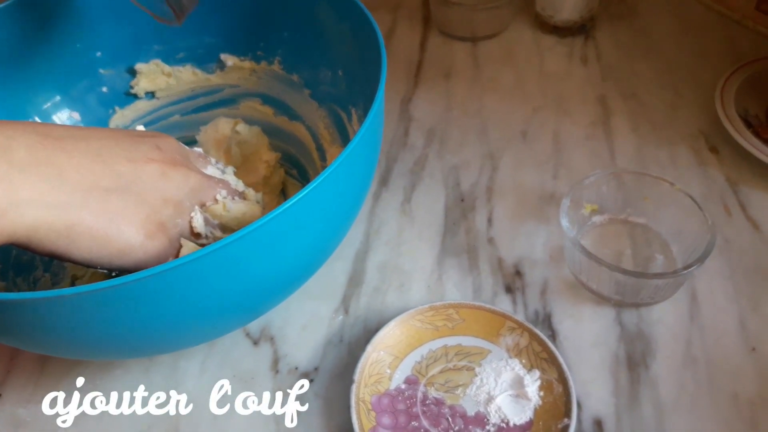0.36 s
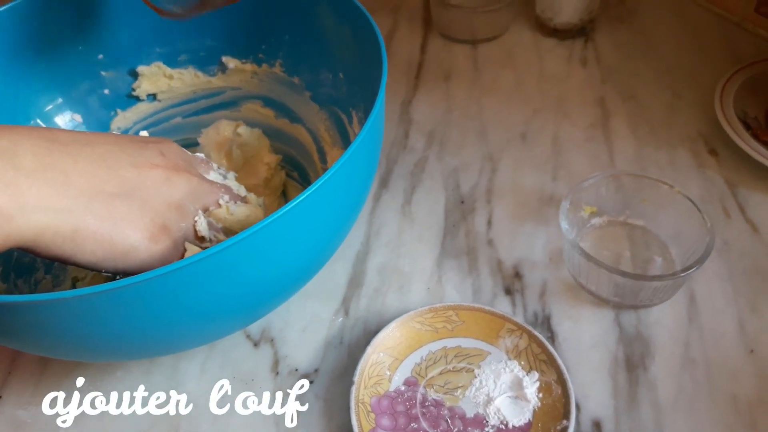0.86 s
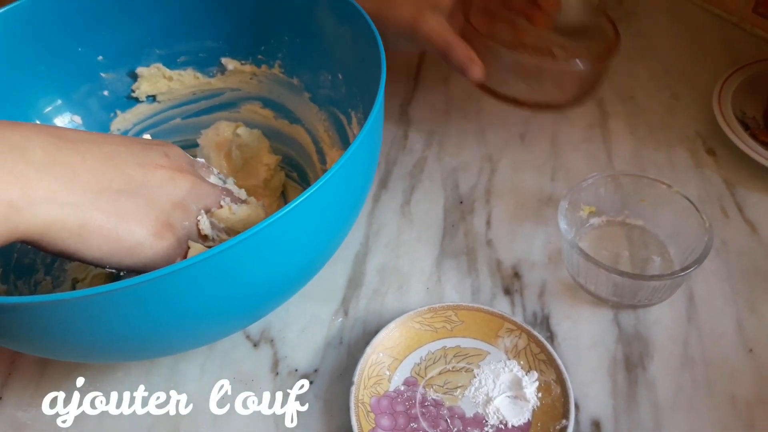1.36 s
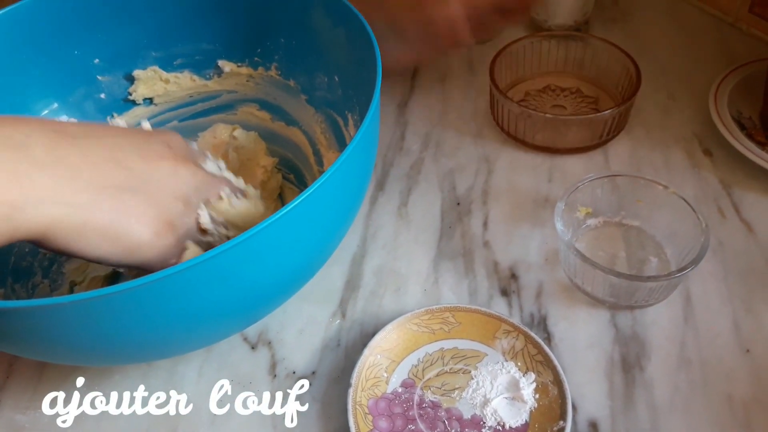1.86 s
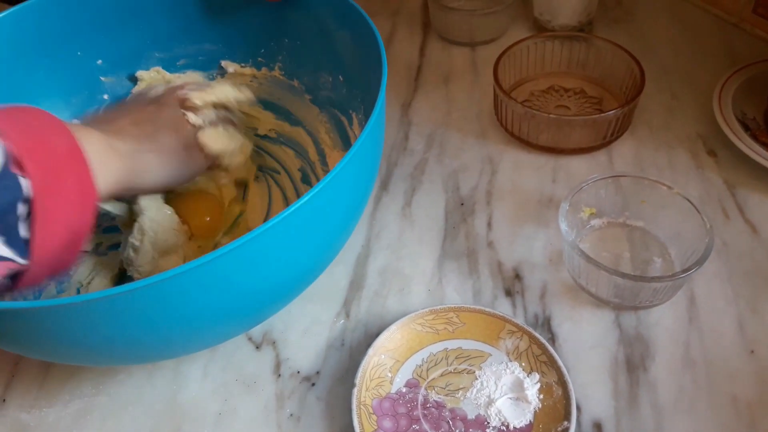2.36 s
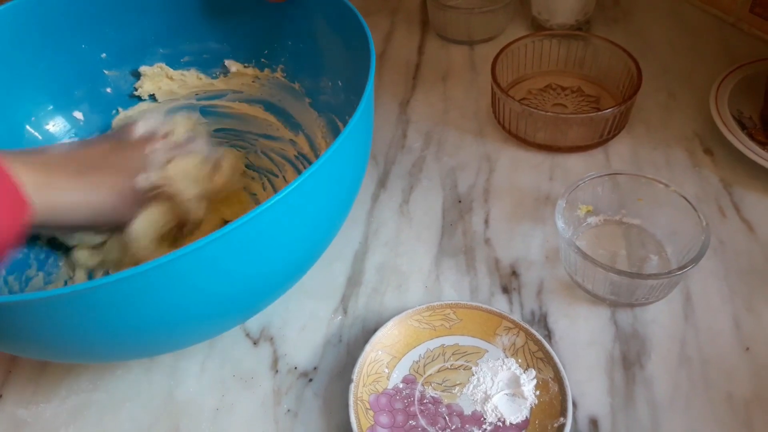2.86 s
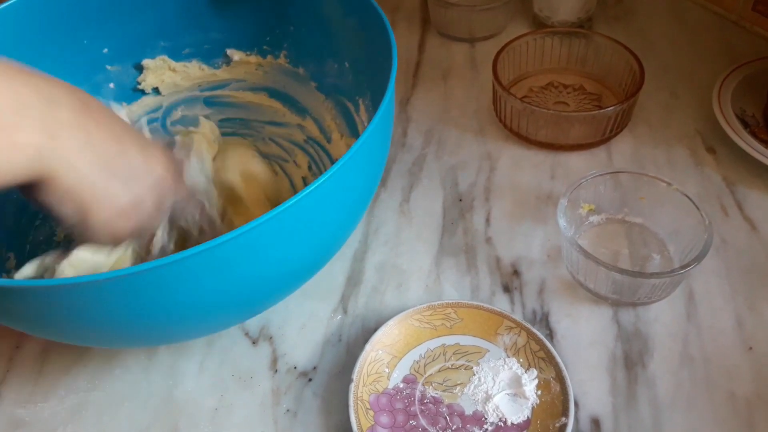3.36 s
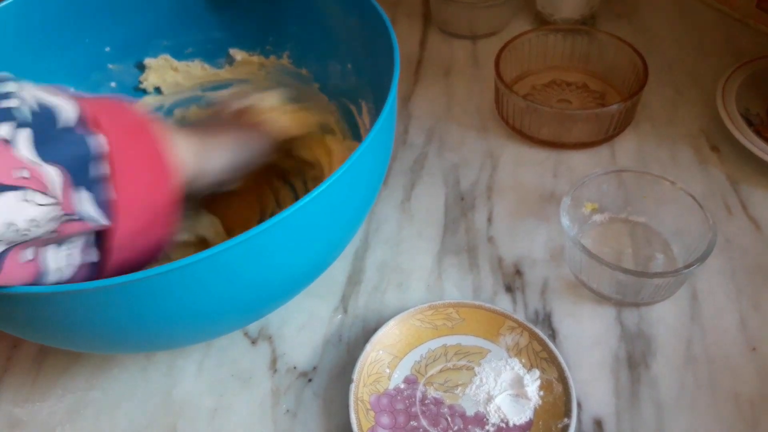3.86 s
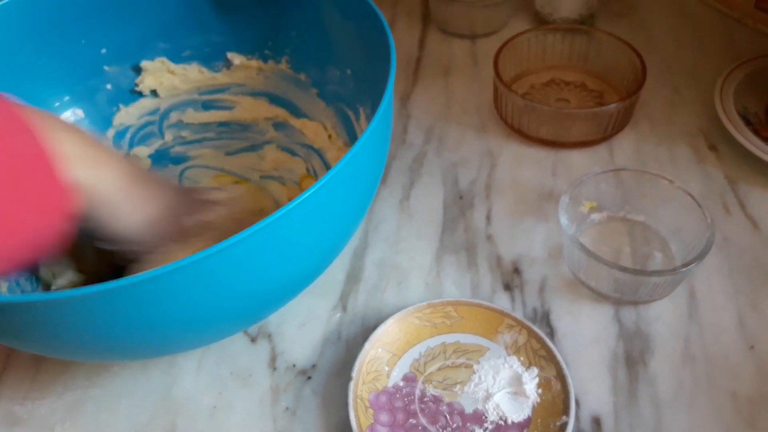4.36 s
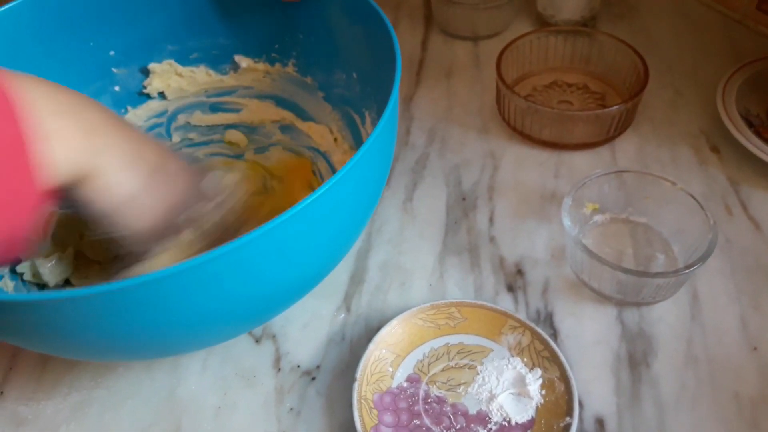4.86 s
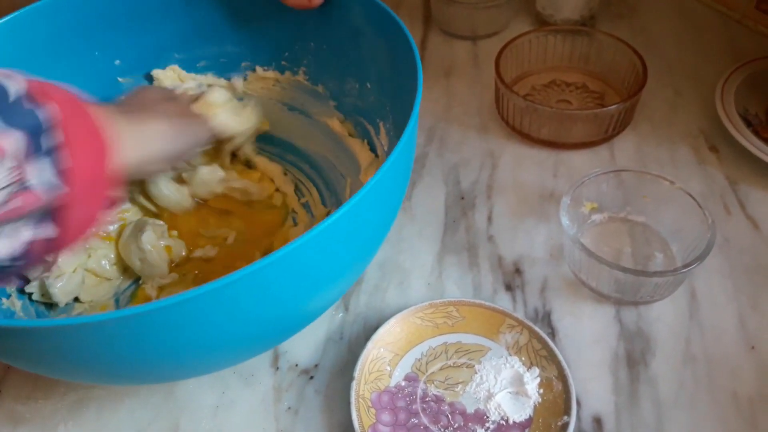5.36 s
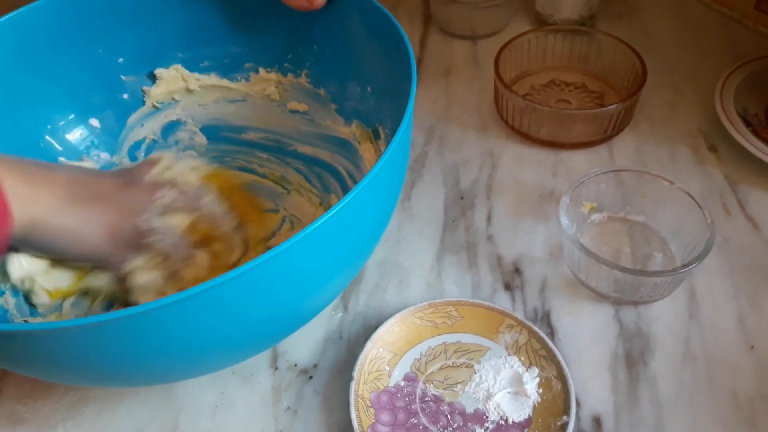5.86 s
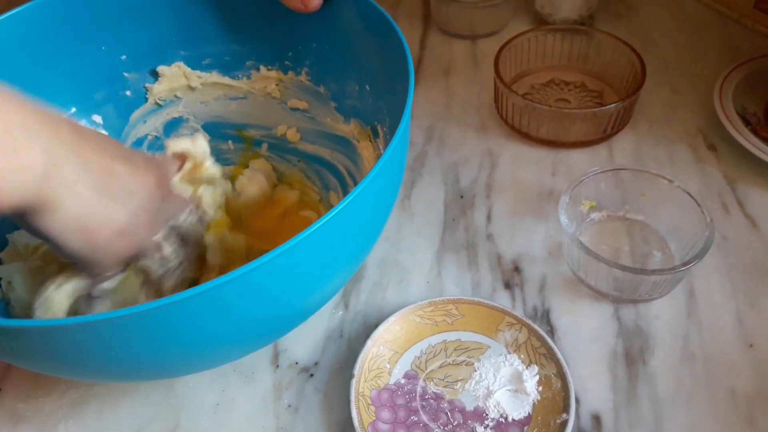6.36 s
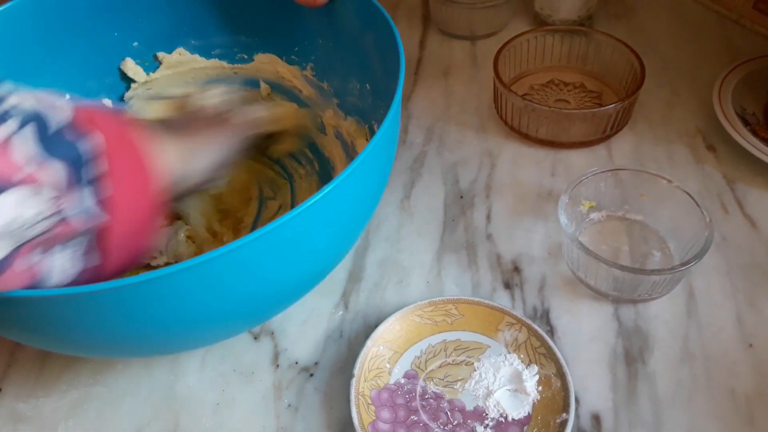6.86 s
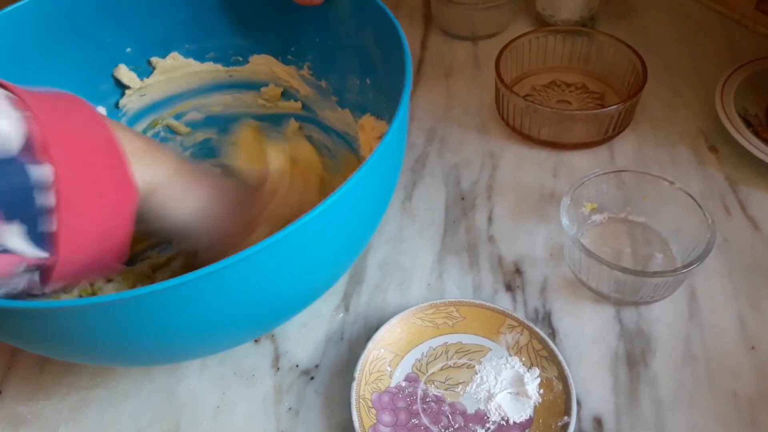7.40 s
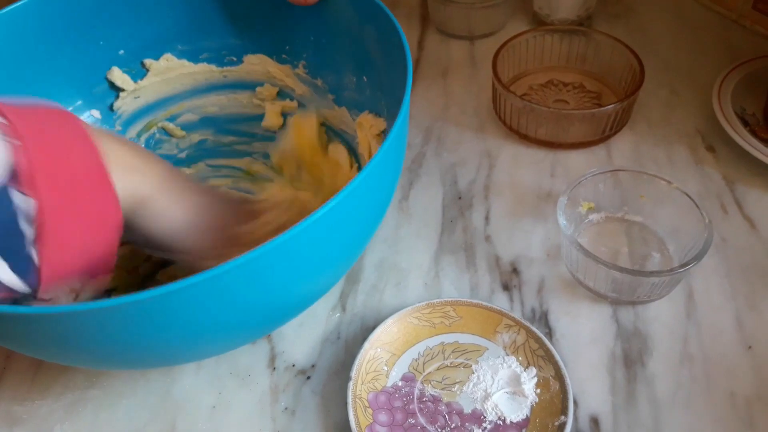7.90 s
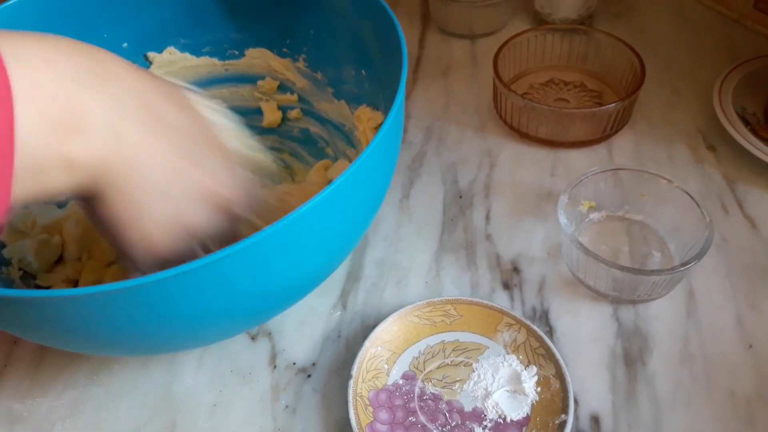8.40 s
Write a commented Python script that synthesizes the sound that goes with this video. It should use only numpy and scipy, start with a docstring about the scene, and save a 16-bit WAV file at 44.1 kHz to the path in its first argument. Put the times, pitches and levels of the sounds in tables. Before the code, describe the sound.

After quiet room hum, glass touches stone twice, followed by sticky, crackling dough mixing with wet smacks and hollow bowl thumps in a hard-walled kitchen.

```python
"""Dough worked in a bowl on stone

A glass dish is set down on a stone worktop, rim first, then flat: dying sinusoids ring and the stone knocks.
A hand then works egg into soft dough in a plastic bowl: shaped noise and rising blips make the paste smear and
crackle, bursting cavities smack, and the bowl rocks and thuds on the stone as pulses that rouse low room modes.
Decaying noise gives the answer of a hard-walled kitchen; filtered noise gives its low hum and hiss."""
import sys
import numpy as np
from scipy import signal
from scipy.fft import rfft, irfft, next_fast_len
from scipy.io import wavfile
from scipy.ndimage import uniform_filter1d, minimum_filter1d, map_coordinates

SR = 44100
rng = np.random.default_rng(int(sys.argv[2]) if len(sys.argv) > 2 else 0)


def how_loud(loudness_db):
    """Turn decibels into a plain amplitude multiplier (0 dB gives 1, 20 dB gives 10)."""
    steps = np.asarray(loudness_db, float) / 20
    return 10 ** steps


def unload_wav(signal):
    """Save mono or channel-first audio to the path in sys.argv[1] as 16-bit WAV at rate SR, clipped to [-1, 1]."""
    wavfile.write(
        sys.argv[1],
        SR,
        np.round(np.clip(np.atleast_2d(signal).T, -1, 1) * 32767).astype(np.int16),
    )


N = 375172

# How hard the hand drags the paste. Each row: time in seconds, relative smear level in dB.
STROKE = [(1.95, -49), (2.11, -65), (2.28, -49), (2.59, -48), (2.77, -39.5), (2.92, -44.5), (3.37, -49.5),
          (3.72, -43), (3.9, -47), (4.19, -38), (4.36, -42.5), (4.5, -36), (4.78, -39.5), (5.09, -48),
          (5.21, -39.5), (5.4, -41.5), (5.74, -41.5), (6.14, -43), (6.51, -64), (6.62, -43), (6.73, -39.5),
          (6.9, -42), (7.51, -37.5), (7.7, -41), (7.92, -38), (8.26, -40.5), (8.41, -45.5)]
# How hard the bowl is pushed about. Each row: time in seconds, rumble level in dB.
SHOVE = [(1.95, -72), (2.44, -66), (2.6, -51), (3.54, -51), (3.87, -56), (4.19, -50), (4.75, -48),
         (4.95, -54), (6.5, -58), (6.62, -51), (6.85, -57.5), (7.18, -55), (7.39, -49), (8.26, -50),
         (8.41, -65)]
# Colour of the smeared paste. Each row: frequency in Hz, density in dB per Hz.
SMEAR = [(350, -30.5), (600, -2.5), (749, -7.5), (1260, -3.5), (1360, -5), (1540, 0), (2010, -4.5),
         (3130, -3.5), (5390, -8.5), (6880, -14.5), (8500, -64), (11000, -38), (18700, -120)]
# Colour of the fine, wet spray. Each row: frequency in Hz, density in dB per Hz.
SPRAY = [(4410, -14), (7500, -0.5), (8290, -6), (11600, 0.5), (15100, -0.5), (15800, -19)]
# Colour of the bowl's rumble and thump. Each row: frequency in Hz, density in dB per Hz.
RUMBLE = [(35, -56), (60, -55), (97, 1), (145, -4), (236, 2), (268, -0.5), (307, 0.5), (605, 6),
          (900, -20.5), (1170, -26), (1980, -120)]
# The clearest air pockets bursting in the dough.
# Each row: start in seconds, level in dB, cavity pitch at the start in Hz, puff in dB, fine hiss in dB.
SMACKS = [(2.5242, -36, 2990, -10.5, -40), (2.7244, -36.5, 1476, -3.5, -25), (2.9352, -33, 1070, -15, -32),
          (2.9509, -27, 1040, -9, -26), (2.9826, -34, 940, -13, -35), (3.0033, -32.5, 710, -3, -37),
          (3.1006, -28, 1780, -23, -35), (3.1117, -25, 706, -9, -29.5), (3.1645, -16, 912, -6.5, -21.5),
          (3.462, -31.5, 3250, -7.5, -29), (3.7471, -31, 1710, -7, -21), (3.7798, -29, 2050, -5, -24.5),
          (4.2314, -22.5, 1080, -17, -26), (4.3903, -22.5, 1130, -12, -28.5),
          (4.7224, -32, 2230, -0.5, -20.5), (4.787, -26, 910, -22, -36), (5.33, -35.5, 3400, -0.5, -18),
          (5.6597, -41.5, 1515, -24, -8), (6.0107, -36.5, 1734, 0, -34), (6.1632, -21.5, 1500, -22, -45),
          (6.1837, -27, 1027, -9.5, -14), (6.3854, -47.5, 686, -0.5, -8), (6.6025, -24, 1560, -24, -40),
          (6.755, -23, 1246, -10.5, -30), (7.3163, -37.5, 1740, 1, -14), (7.4517, -30, 1164, -18, -36),
          (7.5188, -28, 2730, -6, -19), (7.6919, -23.5, 966, -12.5, -39), (7.7957, -33.5, 3090, -6, -20.5),
          (7.9228, -32.5, 1440, -4.5, -17), (8.0426, -29.5, 2770, -5.5, -29), (8.115, -36, 2920, 0.5, -15),
          (8.2268, -20.5, 2215, -3, -24)]
# The bowl landing on the worktop. Each row: start in seconds, level in dB, slap in dB,
# boom in dB per octave down, slap brightness in dB per octave up.
THUDS = [(2.169, -32, 1, 1.5, 3.5), (2.751, -21.5, -23, 3, 5), (3.324, -11, -9, -2.5, 2.5),
         (3.617, -24, -8.5, 2, -4), (4.129, -40.5, 12.5, 13, 3.5), (4.476, -3, -9.5, 0, -3),
         (5.056, -6.5, -0.5, 1.5, 0.5), (6.296, -22, -14, 3.5, -1.5), (6.548, -31.5, -2, 3, 1),
         (6.66, -31, 2, 1.5, 6), (6.753, -27, 1, 0.5, 10), (7.555, -4.5, -6, 1.5, 0.5),
         (8.489, -21.5, 3.5, 5.5, 2)]
# Low modes of the room, roused by each landing. Each row: mode in Hz, relative level in dB, t60 in seconds.
ROOM_MODES = [(116, -25, 0.13), (148.7, -11, 0.35), (247.6, -14, 0.42), (308.7, -4.5, 0.29),
              (351, -9, 0.68), (376, -9, 0.52), (420, -19, 0.68), (485, -3.5, 0.47), (523.5, -3.5, 0.31),
              (573, -10, 0.59), (625, -17, 0.18), (795, -17, 0.38)]
# Colour of plastic slapping stone. Each row: frequency in Hz, density in dB per Hz.
SLAP = [(400, -21), (700, -8), (1500, -0.5), (2500, -10), (4000, -13.5), (6400, -28), (7900, -43),
        (15500, -48)]
# Glass touching stone. Each row: start in seconds, level of the stone's knock in dB, hardness from 0 to 1.
CLINKS = [(1.629, -7.5, 0), (1.83, 3, 0.58)]
# Ringing lines of the dish in the room, in Hz; close ones share a glass mode.
GLASS_LINES_HZ = [2143, 2176, 2195, 4369, 4388, 4394, 5200, 5566, 5588, 5632, 6878, 6918, 8294, 9080, 9897,
                  9938, 12948, 13430, 13475, 15248]
# How those lines ring. Each row: t60 in seconds, relative dB struck at the rim, relative dB struck flat.
GLASS = [(0.11, -21, -12), (0.43, -35.5, -17), (0.5, -29, -21.5), (0.12, -39, -31), (0.36, -46, -17.5),
         (0.44, -41.5, -10.5), (0.028, -51, -4), (0.33, -48, -24), (0.26, -47, -14.5), (.25, -55, -19.5),
         (0.13, -84, -23), (0.11, -84, -11), (0.33, -84, -49), (0.28, -87, -36), (.18, -91, -46),
         (.2, -91, -40), (0.31, -82, -31), (.18, -87.5, -52), (.18, -86, -43), (.2, -78, -40.5)]
# Colour of the stone's knock. Each row: frequency in Hz, density in dB per Hz.
STONE = [(90, -49), (200, -11.5), (700, -7), (1400, -7), (2100, -10.5), (2800, -9.5), (3600, -21),
         (5500, -19), (7000, -41), (7800, -52.5), (12000, -52.5), (15500, -71.5)]
# Decay of the kitchen. Each row: frequency in Hz, t60 in seconds.
KITCHEN = [(150, 0.72), (600, 0.47), (2000, 0.49), (5000, 0.47), (12000, 0.34)]
# Colour of the room noise. Each row: frequency in Hz, density in dB per Hz.
AIR = [(12, -56), (20, -28), (69, -22.5), (145, -5), (175, -10), (239, -14), (276, -16), (334, -9),
       (368, -14), (552, -11), (978, -18.5), (2600, -21), (6000, -34.5), (7800, -54), (13200, -120)]
# A wavering hum. Each row: centre in Hz, half-width at half amplitude in Hz, rms level in dB.
HUM = [(141, 15, -68), (238.3, 14, -62.5), (611, 10, -75.5)]
# Colour of the microphone's hiss. Each row: frequency in Hz, density in dB per Hz.
MIC_HISS = [(2940, -18), (5000, -17), (6000, -6), (7940, -13.5), (9130, -11), (11300, -6), (15800, -4.5)]

# spray at the usual smear, and dB of spray for each dB of smear
SPRAY_DB, SPRAY_GROWS, USUAL_SMEAR_DB, SPRAY_FLICKER_DB = -57.5, 0.8, -42.5, 2.2
# a pocket of the usual level takes this long to reach its loudest
POCKET_LIFE_S, USUAL_POCKET_DB = 0.0033, -34
# fainter pockets: level over the smear and its spread, middle pitch and its spread, puff and hiss
FAINT_DB, FAINT_SPREAD_DB, FAINT_HZ, FAINT_OCTAVES = 9.5, 2.5, 2500, 0.5
FAINT_PUFF_DB, FAINT_HISS_DB = -8.5, -30
RING_DB, THUMP_DB, SLAP_DB = -12.5, -1.5, 1.5  # the parts of a landing, added to its level
ROCK_DB, ROCK_S = -46, 0.05  # rumble after a landing: dB added to its level, time scale
FIRST_WALL_S = 0.009
ROOM_DB, ROOM_STEP_DB, ROOM_STEP_S = -52, 1.8, 0.79  # the room noise steps up at this moment


def dough():
    """Friction noise: paste dragged on the bowl slides in drifting patches of colour, over popping pockets."""
    (smear_db,), (shove_db,) = curves(STROKE), curves(SHOVE)
    spray_db = SPRAY_DB + SPRAY_GROWS * (smear_db - USUAL_SMEAR_DB)
    spray_db = spray_db + SPRAY_FLICKER_DB * wobble(9)
    start = np.clip((np.arange(N) / SR - 1.95) / 0.2, 0, 1)
    z = signal.stft(rng.standard_normal(N) * how_loud(1.6 * wobble(40)), nperseg=512)[2]
    # random gain in time and frequency, smoothed into patches
    patches = uniform_filter1d(rng.standard_normal(z.shape), size=8, axis=0)
    patches = uniform_filter1d(patches, size=4, axis=1)
    slide = unit(signal.istft(z * how_loud(2.2 * unit(patches)), nperseg=512)[1][:N])
    pops = bubbles(count=2500, mid_hz=2635, octaves=0.883, cycles=1.7, spread_db=1.5)
    smear = how_loud(smear_db) * (coloured(slide, SMEAR) + 0.5 * pops)
    wet = smear + how_loud(spray_db) * coloured(slide, SPRAY)
    rumble_gain = (how_loud(shove_db) + rocking()) * how_loud(1.6 * wobble(14))
    rumble = rumble_gain * coloured(rng.standard_normal(N), RUMBLE)
    return how_loud(-4.5) * kitchen(start * wet, wet_db=-11)[:N] + start * rumble


def bubbles(count, mid_hz, octaves, cycles, spread_db):
    """Bubble oscillation: tiny pockets pop in clumps, each a few cycles at its own rising pitch."""
    density = np.cumsum(how_loud(7 * wobble(18)))
    when, pitch, size = rng.random(count), rng.standard_normal(count), rng.exponential(size=count)
    start = np.searchsorted(density, when * density[-1])[:, None]
    k = np.arange(256)
    hz = np.clip(mid_hz * 2 ** (octaves * pitch), 500, 5000)[:, None]
    turns = hz * k / SR
    level = how_loud(spread_db * np.minimum(size, 3))[:, None]
    tone = np.sin(2 * np.pi * turns * (1 + 0.031 * turns))
    pops = level * tone * turns * np.exp(-turns / cycles)
    return unit(np.bincount((start + k).ravel(), pops.ravel(), N)[:N])


def rocking():
    """Transient excitation: the gain of the rumble swells and fades after each landing."""
    t = np.arange(N) / SR
    total = 0
    for s, db, *_ in THUDS:
        u = np.clip(t - s, 0, None) / ROCK_S
        total = total + how_loud(db + ROCK_DB) * u * u * np.exp(2 - u)  # the swell reaches 4 at u = 2
    return total


def smacks():
    """Cavity resonance: an opening pocket puffs and rings roughly, its pitch climbing as the gap widens."""
    out, t, wet = np.zeros(N), np.arange(SR // 8) / SR, click(SMEAR)
    for s, db, hz, puff_db, hiss_db in pockets(count=14):
        # a louder pocket bursts faster; a slow one also opens softly
        life = np.clip(POCKET_LIFE_S * how_loud(-0.4 * (db - USUAL_POCKET_DB)), 0.0005, 0.04)
        u = t / life
        envelope = np.e * u * np.exp(-u)
        puff, spray, flutter = rng.standard_normal((3, len(t)))
        roughness = 1 + 0.73 * unit(uniform_filter1d(flutter, size=50))
        cavity = np.sin(2 * np.pi * hz * (t + 6 * t * t)) * roughness
        air = how_loud(puff_db) * unit(np.convolve(puff, wet)[:len(t)])
        air = air + how_loud(hiss_db) * coloured(spray, SPRAY)
        add(out, s, how_loud(db) * kitchen(envelope * (0.41 * cavity + air), wet_db=-2.0))
    return out


def pockets(count):
    """A random point process: to the clear pockets it adds fainter ones, likelier where the drag is harder."""
    smear_db, = curves(STROKE)
    drag = np.cumsum(how_loud(smear_db) * (np.arange(N) / SR > STROKE[0][0]))
    at = np.searchsorted(drag, rng.random(count) * drag[-1] * 0.98)
    size, pitch, puff, hiss = rng.standard_normal((count, 4)).T
    db = smear_db[at] + FAINT_DB + FAINT_SPREAD_DB * size
    hz = FAINT_HZ * 2 ** (FAINT_OCTAVES * pitch)
    return SMACKS + list(zip(at / SR, db, hz, FAINT_PUFF_DB + 5 * puff, FAINT_HISS_DB + 3 * hiss))


def bowl():
    """Impact: each landing thumps, rouses the low modes of the room anew and slaps; a flat one booms more."""
    out, octaves_down = np.zeros(N), np.log2(450 / np.transpose(ROOM_MODES)[0])
    for s, db, slap_db, boom_db, bright_db in THUDS:
        body = [(hz, level + boom_db * np.log2(450 / hz)) for hz, level in RUMBLE]
        slap = [(hz, level + bright_db * np.log2(hz / 1500)) for hz, level in SLAP]
        mode_db = boom_db * octaves_down + rng.normal(0, 2.97, len(ROOM_MODES))
        add(out, s, how_loud(db + RING_DB) * ring(ROOM_MODES, mode_db, attack=0.0006, flutter_db=3.0))
        add(out, s, how_loud(db + THUMP_DB) * kitchen(click(body), wet_db=0.5))
        add(out, s, how_loud(db + slap_db + SLAP_DB) * kitchen(knock(slap, life=0.0081), wet_db=4))
    return out


def dish():
    """Impact excitation: each contact strikes the glass at its own spot; a harder one knocks brighter on stone."""
    out = np.zeros(N)
    t60, *strengths = np.transpose(GLASS)
    for (s, db, hard), line_db in zip(CLINKS, strengths):
        lines = np.transpose([GLASS_LINES_HZ, line_db, t60])
        glass = ring(lines, rng.normal(0, 0.3, len(lines)), attack=0.00036, flutter_db=6.0)
        stone = [(f, level + 9 * hard * np.log2(f / 2000)) for f, level in STONE]
        add(out, s, how_loud(2.5) * kitchen(glass, wet_db=-7.5))
        add(out, s, how_loud(db) * kitchen(knock(stone, life=0.0082), wet_db=6.0))
    return out


def ring(lines, gains_db, attack, flutter_db):
    """Superposition of dying sinusoids with fluttering levels; neighbours start opposed, so close pairs beat."""
    t = np.arange(SR * 3 // 4) / SR
    hz, db, t60 = np.transpose(lines)[:, :, None]
    sign = (-1) ** np.arange(len(lines))[:, None]
    knots = rng.standard_normal((len(hz), 40))
    flutter = flutter_db * np.array([np.interp(t, np.arange(40) / 50, row) for row in knots])
    level = how_loud(db + gains_db[:, None] + flutter - 60 * t / t60)
    return (sign * level * np.sin(2 * np.pi * hz * t)).sum(0) * (1 - np.exp(-t / attack))


def knock(spectrum, life):
    """Contact noise: a sharp contact and a fainter chatter after it share the energy of the bare contact."""
    t = np.arange(SR // 50) / SR
    chatter = 0.04 * rng.standard_normal(len(t)) * np.exp(-t / life)
    chatter[0] = 1
    bare = click(spectrum)
    pulse = np.convolve(chatter, bare)
    return pulse * np.linalg.norm(bare) / np.linalg.norm(pulse)


def kitchen(x, wet_db):
    """Reverberation: a softer gap, a bunch of near echoes, then a tail that dies by frequency."""
    hz, t, z = signal.stft(rng.standard_normal(SR * 3 // 4), SR, nperseg=256)
    decay = how_loud(-60 * t / along(KITCHEN, hz)[:, None])
    tail = signal.istft(z * decay, SR, nperseg=256)[1]
    late = np.arange(len(tail)) / SR - FIRST_WALL_S
    tail *= np.where(late < 0, 0.3, 1 + 1.65 * np.exp(-abs(late) / 0.0046))
    answer = signal.fftconvolve(x, tail / np.linalg.norm(tail))
    return np.pad(x, (0, len(tail) - 1)) + how_loud(wet_db) * answer


def background():
    """Stationary noise: room noise, a few narrow, unsteady hums and the microphone's own hiss."""
    step_db = ROOM_STEP_DB * (np.arange(N) / SR > ROOM_STEP_S)
    room = how_loud(ROOM_DB + step_db + 0.63 * wobble(4.03)) * coloured(rng.standard_normal(N), AIR)
    out = room + how_loud(-71.5) * coloured(rng.standard_normal(N), MIC_HISS)
    for hz, width, db in HUM:
        narrow = filtered(rng.standard_normal(N), lambda f: 1 / (1 + ((f - hz) / width) ** 2))
        out = out + how_loud(db) * unit(narrow)
    return out


def unit(x):
    """Normalisation of power: x scaled to rms 1."""
    return x / np.sqrt(np.mean(x ** 2) + 1e-20)


def along(points, hz):
    """Interpolation of (Hz, value) points on a logarithmic frequency axis."""
    f, v = np.transpose(points)
    return np.interp(np.log(hz + 1), np.log(f + 1), v)


def curves(rows):
    """Linear interpolation in time: one value per sample for each column after the time."""
    s, *cols = np.transpose(rows)
    return [np.interp(np.arange(N) / SR, s, c) for c in cols]


def wobble(rate):
    """Slow modulation: a smooth random curve with rate knots a second."""
    return map_coordinates(rng.standard_normal(int(N * rate / SR) + 4), [np.arange(N) * rate / SR])


def filtered(x, response):
    """Linear filtering: the spectrum of x times a response of frequency."""
    m = next_fast_len(len(x) + 8192)
    return irfft(rfft(x, m) * response(np.fft.rfftfreq(m, 1 / SR)), m)[:len(x)]


def coloured(x, spectrum):
    """Spectral shaping: x filtered by a spectrum, then scaled to rms 1."""
    return unit(filtered(x, lambda hz: how_loud(along(spectrum, hz))))


def click(spectrum, size=2048):
    """Minimum phase: the folded cepstrum gives the shortest causal pulse with this spectrum, peak 1."""
    cepstrum = irfft(np.log(how_loud(along(spectrum, np.fft.rfftfreq(size, 1 / SR))) + 1e-6))
    cepstrum[1:size // 2] *= 2
    cepstrum[size // 2 + 1:] = 0
    pulse = irfft(np.exp(rfft(cepstrum)))
    return pulse / abs(pulse).max()


def add(track, s, sound):
    """Superposition: a sound is summed into the track at time s."""
    part = track[round(s * SR):][:len(sound)]
    part += sound[:len(part)]


def scene():
    """Superposition of all sources, heard from one spot by a microphone deaf to deep bass."""
    b, a = signal.butter(3, 2 * 95 / SR, "high")
    worktop = dish() + bowl() + smacks() + dough()
    return (signal.lfilter(b, a, worktop) + background())[None]


def limited(x, top_db, ahead, back_db_s):
    """Peak limiting: gain drops just ahead of a peak over the top and climbs back at a steady rate."""
    need = np.minimum(top_db - 20 * np.log10(abs(x) + 1e-9), 0)
    climb = back_db_s * np.arange(N) / SR
    held = np.minimum.accumulate(need - climb) + climb
    size = int(ahead * SR)
    return x * how_loud(uniform_filter1d(minimum_filter1d(held, 2 * size + 1), size))


def band_limit(x):
    """A steep low-pass at the top of the band."""
    return signal.sosfilt(signal.butter(12, 16660, fs=SR, output="sos"), x)


def record(dry):
    """Gain control: a limiter holds the loudest hits down."""
    mix = limited(dry[0], top_db=0.5, ahead=0.0036, back_db_s=99)[None]
    return band_limit(mix)


dry = scene()
out = record(dry)
unload_wav(out)
```